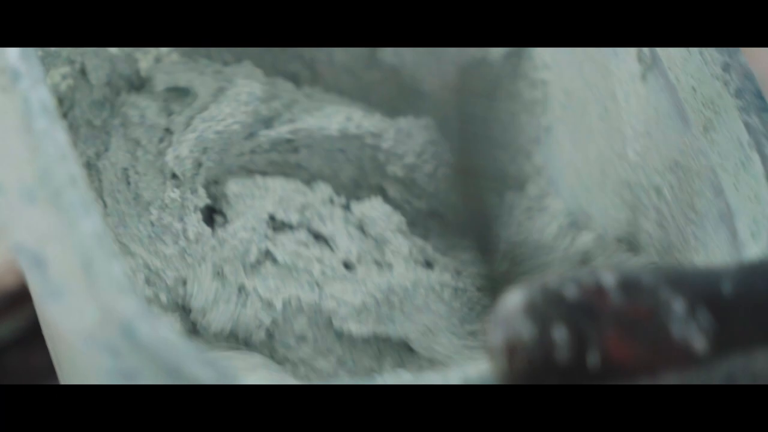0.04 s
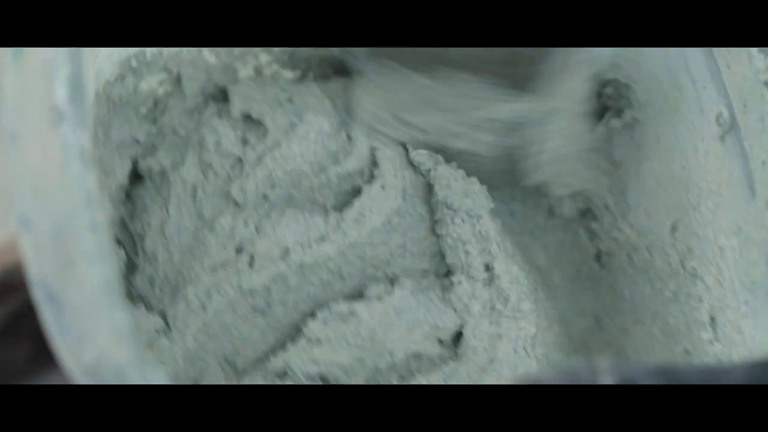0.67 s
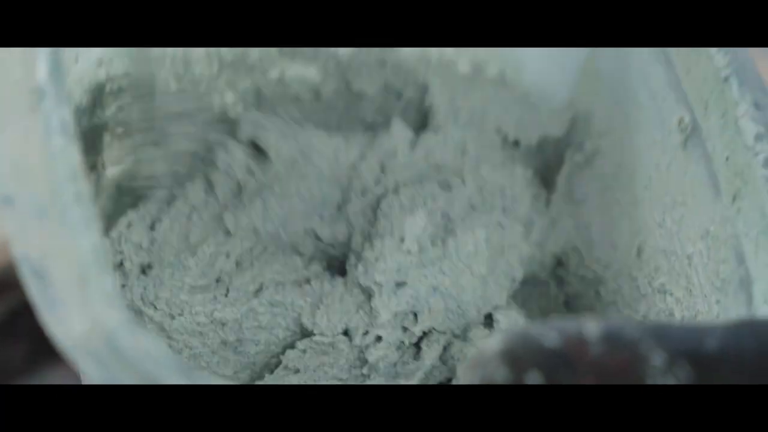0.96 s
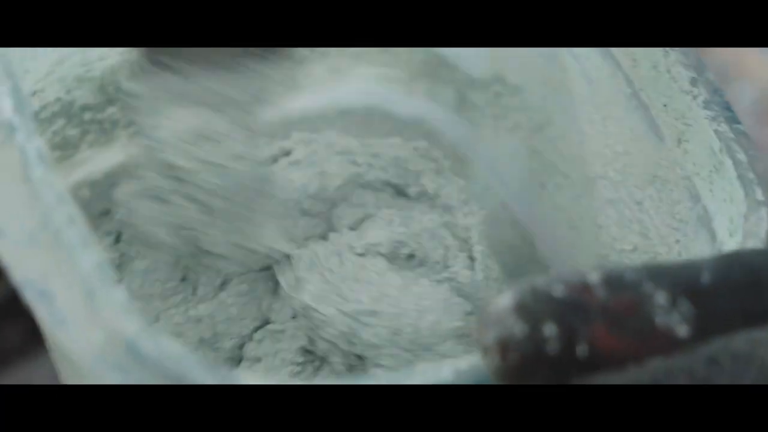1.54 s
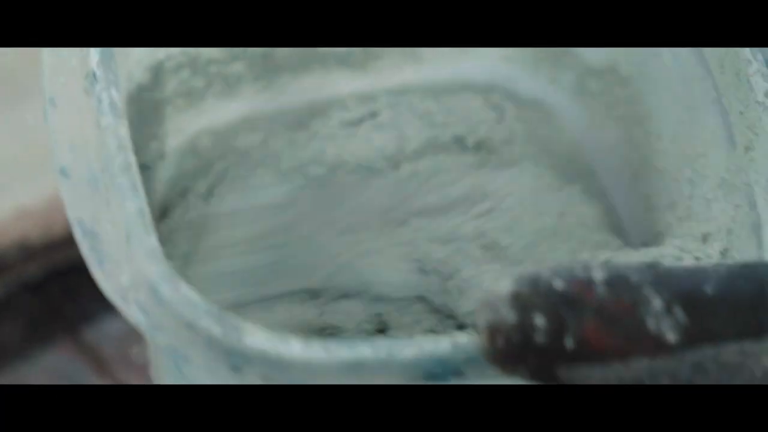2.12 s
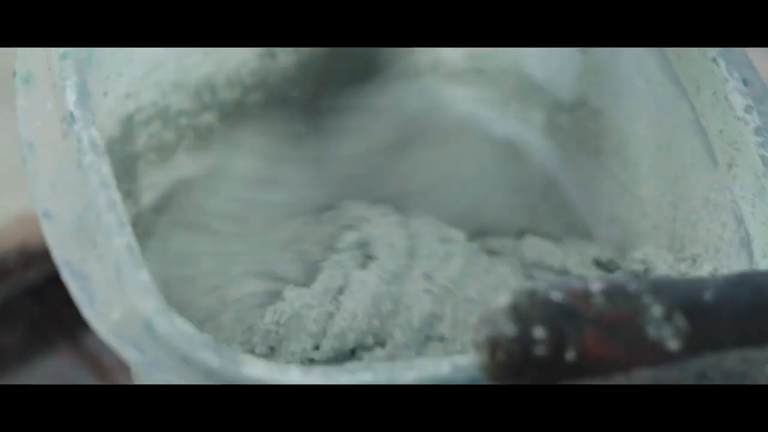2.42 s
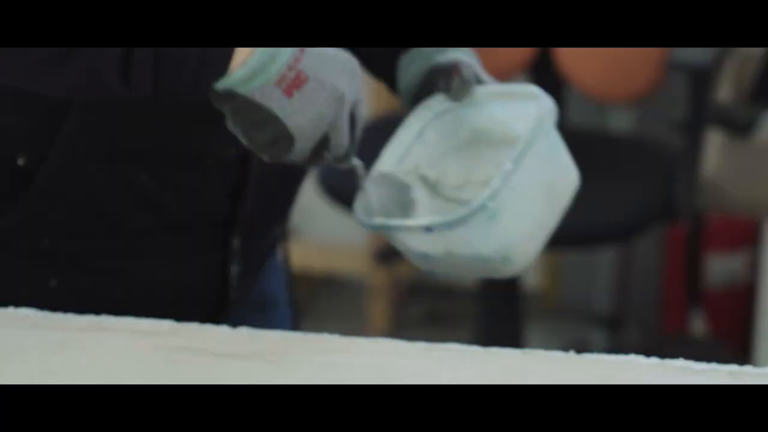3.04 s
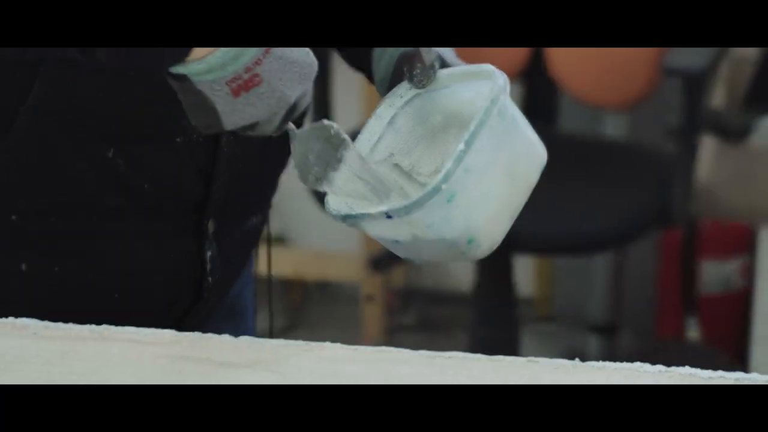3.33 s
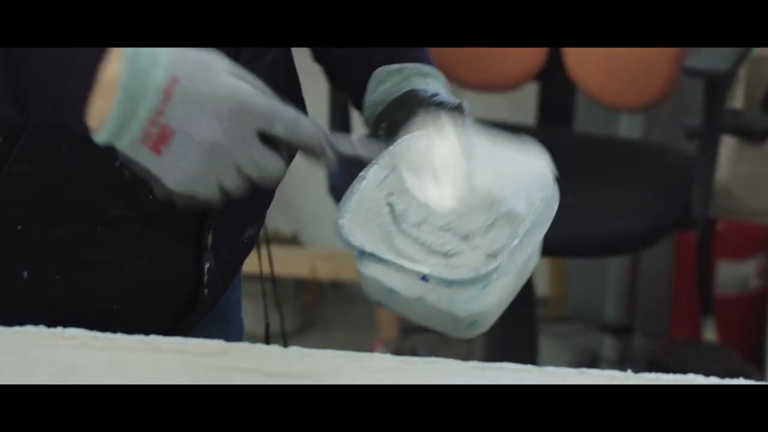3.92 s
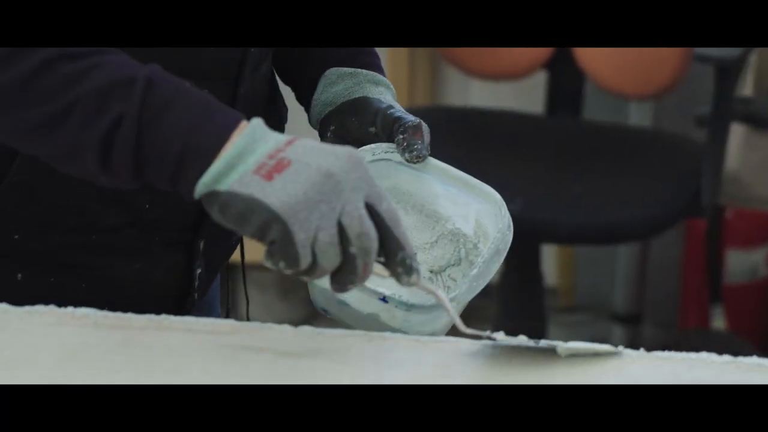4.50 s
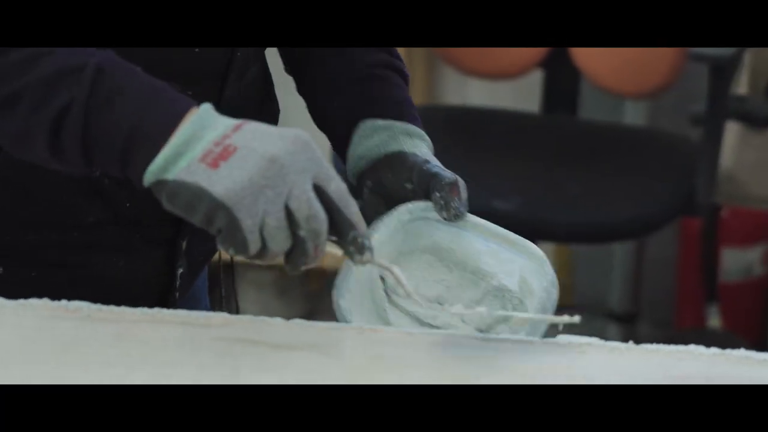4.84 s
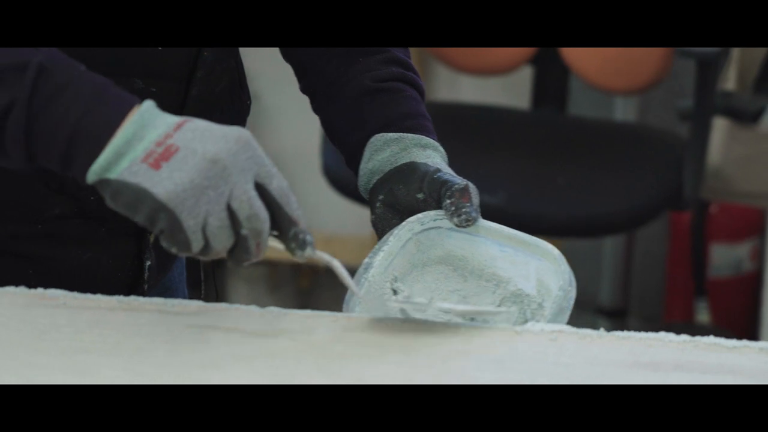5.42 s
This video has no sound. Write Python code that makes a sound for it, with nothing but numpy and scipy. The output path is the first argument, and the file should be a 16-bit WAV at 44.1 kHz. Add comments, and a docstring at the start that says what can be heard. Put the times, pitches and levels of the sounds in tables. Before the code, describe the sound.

Close, gritty scraping and crunching of sand in a plastic tub, followed by a soft trickle and a few faint swishes on canvas.

```python
"""Scooping dry sand

A metal scoop digs and stirs caked sand in a hand-held plastic tub, close by in a studio.
Grains rasp on the blade and rumble in the tub, lumps crack, the wall is knocked; then sand runs off.
Further away, the blade is wiped lightly over a stretched canvas, which swishes and drums."""
import sys
import numpy as np
from scipy import signal
from scipy.fft import rfft, irfft
from scipy.io import wavfile
from scipy.ndimage import uniform_filter1d

SR = 44100
rng = np.random.default_rng(int(sys.argv[2]) if len(sys.argv) > 2 else 0)


def bounce(signal):
    """Save signal as a 16-bit WAV file at the path given by the first command-line argument."""
    frames = np.transpose(np.atleast_2d(signal))
    limited = np.clip(frames, -1, 1)
    pcm = np.round(limited * 32767).astype(np.int16)
    wavfile.write(sys.argv[1], SR, pcm)


N = 249694
T = np.arange(N) / SR
SPREAD = np.array([[1], [-1]])  # adds to the left, subtracts from the right


def undb(db):
    """Decibels to gain."""
    return 10 ** (np.asarray(db) / 20)


def convolve(x, response):
    """Pass each channel of x through an impulse response."""
    return signal.fftconvolve(np.atleast_2d(x), np.atleast_2d(response), axes=1)[:, :N]


def colour(x, curve, size=4096):
    """Minimum-phase EQ of unit energy that follows a (frequency [Hz], level [dB]) curve."""
    hz, db = np.transpose(curve)
    log_hz = np.log(np.fft.rfftfreq(size, 1 / SR) + 1)
    cepstrum = irfft(np.log(undb(np.interp(log_hz, np.log(hz), db))))
    cepstrum[1:size // 2] *= 2  # folding the cepstrum makes the filter causal
    cepstrum[size // 2 + 1:] = 0
    response = irfft(np.exp(rfft(cepstrum)))
    return convolve(x, response / np.linalg.norm(response))


def walk(rate):
    """Random modulator: straight lines between rate random levels a second."""
    return np.interp(T * rate, np.arange(N // 10), rng.standard_normal(N // 10))


def gesture(peak, rise, fall, shape=1.56):
    """Hand-move envelope, 10 dB down at peak - rise and peak + fall; shape 1 is pointed, 2 a bell."""
    away = np.maximum((peak - T) / rise, (T - peak) / fall)
    return undb(-10 * np.minimum(away ** shape, 20))


def swell(start, rise, roundness=1):
    """Sample span and envelope of a hit that peaks at 1 after rise seconds; less round is snappier."""
    span = slice(int(start * SR), min(N, int((start + 14 * rise) * SR)))
    age = np.maximum(T[span] - start, 0) / rise
    return span, (age * np.exp(1 - age)) ** roundness


def grains(rate, scatter_db):
    """Random clicks of rms 1, rate a second; scatter_db makes a few stand out."""
    present = rng.random(N) < rate / SR
    size = undb(scatter_db * np.minimum(rng.exponential(size=N), 4))
    clicks = present * size * rng.choice([-1, 1], N)
    return clicks / np.sqrt(np.mean(clicks ** 2))


def friction(rate, scatter_db, side_db):
    """Stereo texture of grain contacts; side_db sets the width."""
    return grains(rate, scatter_db) + undb(side_db) * SPREAD * grains(2 * rate, scatter_db / 2)


# EQ of the room tone: (frequency [Hz], level [dB])
AIR_EQ = [(25, -24.5), (60, -22.5), (110, -9.5), (170, -9.5), (215, 2.5), (280, -5), (700, 2.5),
          (1500, 3.5), (3000, -2), (6000, -8), (10000, -8.5), (16000, -13)]

def air(level_db=-70, side_db=-5):
    """The still air of the studio lays a faint, steady bed of noise."""
    mid, side = rng.standard_normal((2, N))
    return undb(level_db) * colour(mid + undb(side_db) * SPREAD * side, AIR_EQ)


# sand running off the scoop: (peak time [s], rise [s], fall [s], hiss level [dB])
POURS = [(0.048, 0.015, 0.017, -46), (.22, 0.18, .11, -43.5), (.74, 0.086, 0.094, -48),
         (1.5, .05, 0.093, -46.5), (2.109, 0.097, 0.12, -48.5), (2.44, 0.15, 0.049, -45),
         (3.37, 0.059, 0.16, -44), (3.599, 0.34, 0.22, -48)]

def pouring():
    """Envelope of loose sand sliding off the lifted scoop; overlapping pours add in power."""
    return np.sqrt(sum((undb(db) * gesture(peak, rise, fall)) ** 2 for peak, rise, fall, db in POURS))


# pushes through the sand:
# (peak time [s], rise [s], fall [s], rasp [dB], rumble [dB], hiss [dB], scoop resonance [Hz])
PUSHES = [(0.111, 0.029, 0.036, -30, -37, -28.5, 2440), (.336, .014, .022, -36, -42.5, -40.5, 2450),
          (0.387, .011, 0.015, -30, -48, -26, 2130), (.411, 0.01, 0.018, -29.5, -37, -27.5, 1600),
          (.52, 0.068, 0.088, -38.5, -40, -33, 2520), (0.669, 0.032, 0.035, -36, -39.5, -35, 2430),
          (0.933, 0.023, 0.089, -38.5, -30.5, -36, 2000), (1.04, 0.013, 0.016, -33, -33, -29.5, 2250),
          (1.118, 0.047, 0.08, -34, -35, -33, 2070), (1.215, 0.044, 0.033, -29.5, -31.5, -34.5, 2000),
          (1.34, 0.1, 0.086, -35.5, -35.5, -31.5, 1950), (1.428, .017, 0.031, -20, -23, -27, 1450),
          (1.45, 0.0099, 0.016, -18.5, -15, -41, 2230), (1.78, 0.045, 0.031, -40, -48.5, -40.5, 1590),
          (1.828, .013, 0.017, -33.5, -42, -35, 1630), (1.88, 0.017, 0.048, -38.5, -38, -40, 1680),
          (1.978, 0.066, 0.075, -36, -38, -36.5, 2500), (2.292, 0.03, 0.018, -37.5, -55, -35.5, 1590),
          (2.335, 0.038, 0.022, -45, -38, -41, 2340), (2.36, 0.018, 0.021, -29, -44, -33, 1730),
          (2.512, 0.065, .045, -39, -39.5, -37.5, 2570), (2.632, 0.035, 0.029, -32, -34.5, -28, 2300),
          (2.753, 0.05, 0.038, -39, -47, -36, 2550), (2.853, 0.024, 0.055, -31, -37.5, -30.5, 2220),
          (2.971, 0.026, 0.045, -36.5, -43, -35.5, 2110), (3.13, 0.059, 0.095, -57, -46, -50.5, 2480),
          (3.31, 0.08, 0.056, -45.5, -49, -44, 2840), (3.722, 0.055, 0.055, -43, -43.5, -36, 2700),
          (3.87, 0.038, 0.069, -44.5, -55.5, -58, 2800)]

def pushing():
    """The scoop digs: rasp, rumble and hiss envelopes, and a resonance gliding from push to push."""
    power, pitch, weight = np.zeros((3, N)), 0, 0
    for peak, rise, fall, *db, hz in PUSHES:
        push = gesture(peak, rise, fall) ** 2
        power += undb(db)[:, None] ** 2 * push
        pitch += hz * push
        weight += push
    return np.sqrt(power), pitch / weight


def crumbling(effort, per_s=55, rise_s=.0005, scatter_db=4, largest_db=-25):
    """Envelopes of small lumps breaking at random; a harder push breaks larger ones, up to a limit."""
    balance_db = np.array([1.5, -3.5, 6.5])  # rumble, rasp and hiss against the push
    force = np.zeros((3, N))
    chance = rng.random((1000, 4))
    starts = np.cumsum(-np.log(chance[:, 0])) / per_s
    for start, luck in zip(starts[starts < T[-1]], chance[:, 1:]):
        span, envelope = swell(start, rise_s)
        variation_db = scatter_db * np.log(luck / (1 - luck)) / 2
        size = effort[:, span.start] * undb(balance_db + variation_db)
        force[:, span] += np.minimum(size, undb(largest_db))[:, None] * envelope
    return force


def stick_slip(slips_per_s=150, settle_s=0.0012):
    """Packed sand gives way in sudden slips that settle: a jerky gain of steady power."""
    slips = (rng.random(N) < slips_per_s / SR) * np.minimum(rng.exponential(size=N), 2)
    jerks = 1 + signal.lfilter([1], [1, -np.exp(-1 / (settle_s * SR))], slips)
    return jerks / np.sqrt(uniform_filter1d(jerks ** 2, size=2000))


def hollow(rasp, centre_hz, width_hz=330, ring_db=2.5, plain_db=-2):
    """The half-buried scoop picks out one wavering band of the rasp."""
    wavering_hz = centre_hz * (1 + 0.24 * walk(45))
    # moving band-pass: shift down, smooth, shift back
    turn = np.exp(2j * np.pi * np.cumsum(wavering_hz) / SR)
    pole = np.exp(-np.pi * width_hz / SR)
    band = 2 * np.real(turn * signal.lfilter([1 - pole], [1, -pole], rasp / turn))
    return undb(plain_db) * rasp + undb(ring_db) * band


def walls(x, echo_db=-7, decay_s=0.0025, drift_rate=9, patterns=4):
    """Quick reflections inside the tub; their pattern shifts as the scoop moves between the walls."""
    t = T[:SR // 40]
    shares = np.array([walk(drift_rate) for _ in range(patterns)])
    shares /= np.linalg.norm(shares, axis=0)
    echoes = 0
    for share in shares:
        response = rng.standard_normal(len(t)) * np.exp(-t / decay_s)
        echoes += share * convolve(x, response / np.linalg.norm(response))
    return (x + undb(echo_db) * echoes) / np.hypot(1, undb(echo_db))


# EQ of each sand layer: (frequency [Hz], level [dB])
RUMBLE_EQ = [(30, -55.5), (140, -53), (200, -39), (250, -24), (330, -19), (410, -5.5), (480, -8.5),
             (570, -2.5), (640, -3.5), (710, 2.5), (800, 5), (950, 2.5), (1050, -6), (1500, -9.5),
             (4000, -44.5)]  # boxy body of the filled tub
RASP_EQ = [(100, -64.5), (600, -21), (1000, -9.5), (1250, -9), (1450, 0.5), (1850, -3), (2200, -0.5),
           (2550, -3.5), (2950, 2), (3400, -5), (4300, -10), (9000, -42)]  # sand scraping the blade
HISS_EQ = [(100, -65), (1500, -13), (3000, -7.5), (4000, -2), (5200, -1.5), (6600, -3), (9000, -4.5),
           (12000, -9), (16000, -18.5)]  # grains grinding on each other
DUST_EQ = [(100, -69), (4000, -32), (8000, -9.5), (11000, -4), (13500, 0), (16000, -2.5)]  # top-end sizzle of fine dust
# fader ride of the dust against the hiss of pushes and cracks: (time [s], level [dB])
DUST_RIDE = [(0, -11), (.42, -5), (.95, -8.5), (1.45, -9), (1.85, -2), (2.6, -22), (3.1, -8), (3.72, -8)]

def sand():
    """Pushed, cracking and running sand rumbles in the tub, rasps on the blade and hisses in itself."""
    (rasp, rumble, hiss), centre_hz = pushing()
    cracks, squeak = cracking(centre_hz)
    rumble_crack, rasp_crack, hiss_crack = cracks + crumbling(np.array([rumble, rasp, hiss]))
    dust_gain = undb(np.interp(T, *np.transpose(DUST_RIDE)))
    # a pour feeds all four layers, the hiss most
    pour = pouring()
    dust = np.hypot(dust_gain * hiss, undb(-6) * pour)
    rumble = np.hypot(rumble, undb(-9.5) * pour)
    rasp = np.hypot(rasp, undb(-8.5) * pour)
    hiss = np.hypot(hiss, pour)
    jerks = stick_slip()
    on_tub = rumble * jerks * friction(rate=3300, scatter_db=0, side_db=-24.5) * undb(-1)
    on_blade = hollow(rasp * jerks * friction(rate=4100, scatter_db=2.5, side_db=-14), centre_hz)
    on_grains = hiss * jerks * friction(rate=11000, scatter_db=3, side_db=-5) * undb(-1)
    # a crack is a tight burst of grain contacts
    on_tub += rumble_crack * friction(rate=13000, scatter_db=0, side_db=-20.5)
    on_blade += rasp_crack * friction(rate=7800, scatter_db=3, side_db=-8.5) * undb(-3.5)
    on_grains += hiss_crack * friction(rate=20000, scatter_db=2.5, side_db=-5.5) * undb(-2)
    dust = dust * stick_slip() + dust_gain * hiss_crack
    sizzle = dust * friction(rate=39000, scatter_db=6, side_db=-3.5)
    grit = colour(on_blade, RASP_EQ) + colour(on_grains, HISS_EQ) + colour(sizzle, DUST_EQ)
    return colour(on_tub, RUMBLE_EQ) + walls(grit) + squeak


# the scoop's blows shoving the tub: (time [s], level [dB])
SHOVES = [(.068, -84.5), (0.333, -75), (0.898, -68), (1.322, -76), (1.368, -70), (1.825, -73), (1.86, -68),
          (2.308, -63), (2.558, -79), (2.824, -68)]

def shoving(hz=68, rise_s=0.0042):
    """The scoop's blows shove the loaded tub with a very soft, deep bump."""
    out = np.zeros(N)
    for start, db in SHOVES:
        span, envelope = swell(start, rise_s)
        out[span] += undb(db) * envelope * np.sin(2 * np.pi * hz * (T[span] - start))
    return out


# the scoop hitting the tub wall: (time [s], relative level [dB], wall pitch [Hz])
KNOCKS = [(.0831, -22, 760), (.583, -23, 780), (.72, -28, 618), (.9346, -25, 840), (.9396, -22, 760),
          (1.0065, -16, 797), (1.1696, -18, 840), (1.2389, -32, 800), (1.8196, -20, 760),
          (1.9169, -18.5, 796), (1.9857, -21.5, 710), (2.312, -11.5, 771), (2.3993, -22, 615),
          (2.8303, -22, 900), (2.9211, -12, 760)]

def knocks(rise_s=0.0018, trim_db=-5.5, lower_ratio=0.64, lower_db=-16):
    """The wall swings briefly in two modes until the sand stops it; it is too small to radiate bass."""
    out = np.zeros(N)
    for start, db, hz in KNOCKS:
        span, envelope = swell(start, rise_s)
        phase = 2 * np.pi * hz * (T[span] - start)
        modes = np.sin(phase) + undb(lower_db) * np.sin(lower_ratio * phase)
        out[span] += undb(db + trim_db) * envelope * modes
    return signal.sosfilt(signal.butter(2, 280, "high", fs=SR, output="sos"), out)


# large lumps giving way: (time [s], rumble [dB], rasp [dB], hiss [dB])
CRACKS = [(.084, -31.5, -36, -40), (.166, -41, -29.5, -30), (.331, -36, -33, -29.5),
          (0.3537, -37, -24, -26), (0.3844, -52, -30.5, -23), (0.403, -47, -40, -16.5),
          (0.633, -35, -42, -32), (0.8989, -23.5, -18, -29.5), (0.9171, -23, -20.5, -25.5),
          (0.9352, -17, -28, -48), (1.0924, -29, -25.5, -26.5), (1.2165, -35, -24.5, -27.5),
          (1.2643, -39, -42, -23), (1.2862, -40, -23, -29), (1.347, -39.5, -30, -26.5),
          (1.376, -34.5, -29.5, -28), (1.408, -38, -21, -20.5), (1.744, -33, -39, -43),
          (1.7747, -28.5, -25.5, -38), (1.7877, -36, -27, -38), (1.824, -32, -44, -24),
          (1.8665, -33, -31.5, -31), (1.987, -43, -29.5, -33), (2.2455, -49, -42.5, -45),
          (2.3227, -32, -38, -27.5), (2.3676, -33, -23.5, -29.5), (2.57, -32, -27, -28),
          (2.7274, -48, -21.5, -52), (2.831, -35.5, -37, -30), (2.848, -32, -19.5, -35),
          (2.9169, -36, -26.5, -30), (2.9623, -30, -30, -45), (3.1166, -33, -36, -52),
          (3.121, -38, -28, -35), (3.3975, -63, -32, -31.5)]

def cracking(centre_hz, rise_s=.0011, squeak_db=-1.5):
    """Lumps snap under the blade: rumble, rasp and hiss envelopes, and a squeak at the scoop's pitch."""
    force, squeak = np.zeros((3, N)), np.zeros(N)
    for start, *db in CRACKS:
        span, envelope = swell(start, rise_s, roundness=0.74)
        force[:, span] += undb(db)[:, None] * envelope
        tone = np.sin(2 * np.pi * centre_hz[span.start] * (T[span] - start))
        squeak[span] += undb(db[1] + squeak_db) * envelope * tone
    return force, squeak


# ringing modes of the steel: (frequency [Hz], relative level [dB], t60 [s])
BLADE_MODES = [(575, -4, 0.37), (710, 2.5, 0.24), (1100, -2.5, .5), (1286, -6.5, .35), (1389, -1.5, 0.8),
               (1590, -11.5, 0.53), (1660, -12, 0.93), (2175, -15, .3), (2240, -10, 0.35),
               (2460, -11.5, 0.31), (2740, -8, 0.12)]

def blade(rubbing, ring_db=-24, wobble_hz=20, graze_db=-61.5):
    """The steel rings faintly with whatever rubs it; clinging sand unsettles its modes."""
    t = T[:SR]
    ring = 0
    for hz, db, t60 in BLADE_MODES:
        decay = np.log(1000) / t60
        phase = 2 * np.pi * np.cumsum(hz + wobble_hz * walk(110)[:SR]) / SR
        ring += undb(db) * np.sqrt(decay) * np.exp(-decay * t) * np.sin(phase)
    ring = signal.sosfilt(signal.butter(2, 400, "high", fs=SR, output="sos"), ring)
    # the blade grazes the rim on its way out and sings on
    graze = undb(graze_db) * gesture(peak=4.02, rise=0.14, fall=0.26)
    drive = undb(ring_db) * rubbing + graze * friction(rate=6500, scatter_db=0, side_db=-6.5)
    return convolve(drive, ring / np.linalg.norm(ring))


# EQ of each canvas layer: (frequency [Hz], level [dB])
DRUM_EQ = [(40, -34.5), (110, -26.5), (150, -16), (185, -13), (217, 1), (260, -5.5), (400, -4.5),
           (540, 0.5), (700, 5), (900, 1), (1200, -2.5), (3000, -23.5)]  # body of the taut cloth
SWISH_EQ = [(150, -41.5), (700, -10), (1100, -2.5), (1900, -2.5), (3100, 2), (4200, -1), (6000, -2),
            (8000, -7.5), (12000, -11), (16000, -13.5)]  # the sandy blade sliding on the weave
# strokes over the canvas: (peak time [s], rise [s], fall [s], swish [dB], drum [dB], drum lag [s])
WIPES = [(4.692, 0.016, 0.017, -38, -50.5, 0.012), (5.288, .016, 0.03, -39.5, -47.5, 0.046),
         (5.66, 0.028, 0.045, -49.5, -55, .01)]

def canvas(shape=0.6, drum_shape=.55):
    """Light strokes: fine sand swishes under the blade and the cloth drums just after."""
    swish, drum = np.zeros((2, N))
    for peak, rise, fall, swish_db, drum_db, lag in WIPES:
        swish += undb(swish_db) * gesture(peak, rise, fall, shape)
        drum += undb(drum_db) * gesture(peak + lag, rise=.016, fall=0.058, shape=shape)
    weave = friction(rate=4300, scatter_db=2, side_db=-14)
    fine_sand = friction(rate=14000, scatter_db=3, side_db=-5)
    return colour(drum * weave, DRUM_EQ) + colour(swish * fine_sand, SWISH_EQ)


# studio reverb by band: (frequency [Hz], t60 [s], level [dB])
REVERB_BANDS = [(100, .6, -20), (300, 0.66, -14), (705, 1, -20), (1530, 0.78, -10), (3300, 0.55, -9.5),
                (7100, 0.56, -13), (13860, 0.41, -22)]

def studio(x, far_db=5, side_db=-4, build_s=0.0024):
    """Diffuse reflections, shorter in the treble; their share grows as the work moves away."""
    t = T[:SR]
    hz, t60, db = np.transpose(REVERB_BANDS)
    mid, side = rng.standard_normal((2, SR))
    spectrum = rfft(mid + undb(side_db) * SPREAD * side)
    log_hz = np.log(np.fft.rfftfreq(SR, 1 / SR) + 1)
    response = 0
    for band, seconds, gain in zip(np.eye(len(hz)), t60, undb(db)):
        band_noise = irfft(spectrum * np.interp(log_hz, np.log(hz), band), SR)
        tail = np.exp(-np.log(1000) * t / seconds) * (1 - np.exp(-t / build_s))
        response += gain * tail / np.linalg.norm(tail) * band_noise
    send = undb(np.interp(T, [3.1, 3.3], [0, far_db]))
    return convolve(x.mean(axis=0) * send, response)


def scene():
    """The mix: the action starts a little to the right and ends in the middle, over room tone."""
    action = sand() + knocks() + shoving() + canvas()
    action += blade(action)
    pan_db = np.interp(T, [0, 2.8, 3.6], [-1.5, -1.1, 0])
    return (action + studio(action)) * undb(SPREAD * pan_db / 2) + air()


def record(dry, top_hz=16050):
    """A steep low-pass cuts the very top."""
    return signal.sosfilt(signal.ellip(10, .2, 80, top_hz, fs=SR, output="sos"), dry)


dry = scene()
out = record(dry)
bounce(out)
```